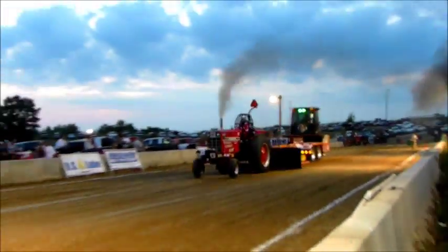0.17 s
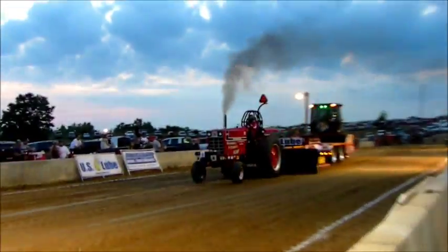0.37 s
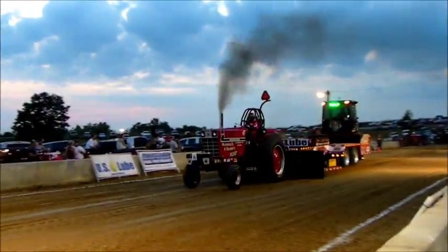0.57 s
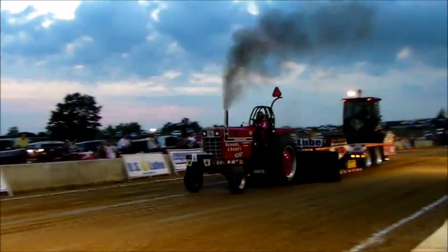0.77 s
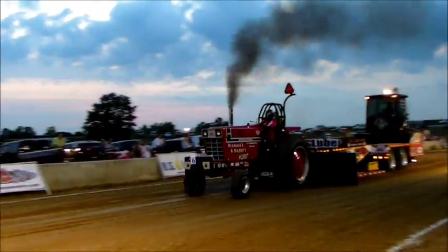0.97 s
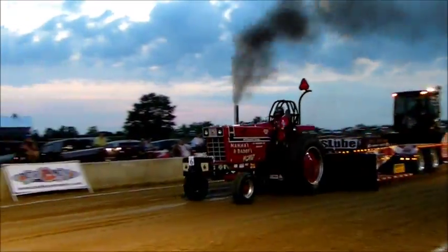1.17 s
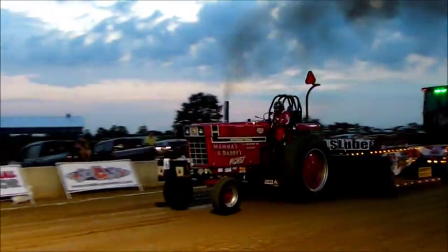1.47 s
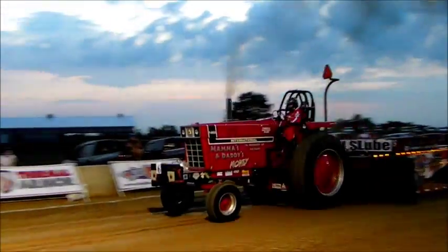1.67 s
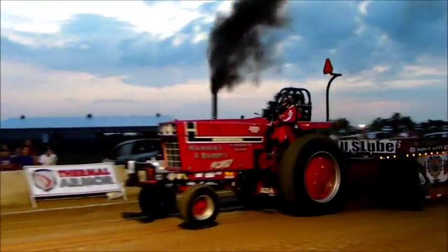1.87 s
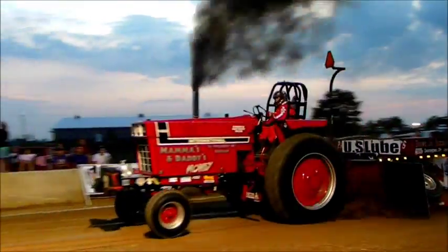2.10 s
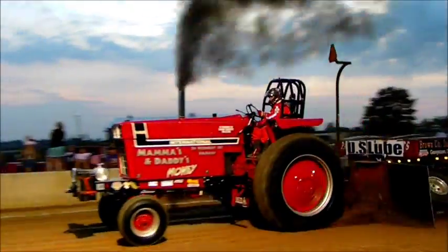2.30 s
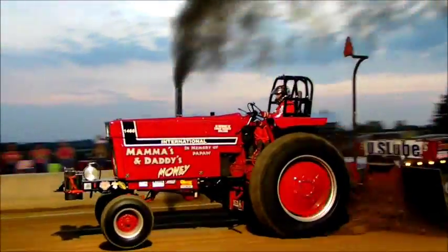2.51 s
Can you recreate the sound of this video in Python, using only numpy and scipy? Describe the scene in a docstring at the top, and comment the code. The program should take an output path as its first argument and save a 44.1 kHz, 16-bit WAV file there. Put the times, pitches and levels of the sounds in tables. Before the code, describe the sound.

A turbocharged diesel pulling tractor at full throttle outdoors, loud steady hissing exhaust with a buzzing mid roar and very high turbo whistle; late on it bogs, the whistle drops and the roar deepens. Mono, slightly overloaded microphone.

```python
"""Pulling tractor nearing the microphone

A turbocharged diesel drags a sled flat out along a dirt track towards the microphone.
Its exhaust stack hisses and roars in bursts, one per firing, made of coloured noise and wavering resonances.
A thin firing tone of a few harmonics lies under them, and the turbo whistles very high.
Near 1.75 s the engine bogs: the turbo drops, the roar sinks to its lower resonance, and boost slowly builds again."""
import sys
import numpy as np
from scipy.fft import rfft, irfft, next_fast_len
from scipy.io import wavfile
from scipy.ndimage import uniform_filter1d, map_coordinates

SR = 44100
rng = np.random.default_rng(int(sys.argv[2]) if len(sys.argv) > 2 else 0)


def transcribe(signal):
    """Save signal, clipped to [-1, 1], as a 16-bit WAV file at the path in sys.argv[1]."""
    frames = np.atleast_2d(signal).T
    limited = np.clip(frames, -1, 1)
    pcm = np.round(limited * 32767).astype(np.int16)
    wavfile.write(sys.argv[1], SR, pcm)


N = 116865

# Rumble of chassis, sled and track. Each row: time in seconds, level in dB before its wavering.
RUMBLE_LEVEL = [(.3, -47), (.7, -67), (1.6, -60), (2.05, -43.5)]
# Colour of the rumble. Each row: frequency in Hz, relative level in dB per Hz.
RUMBLE_COLOUR = [(20, -14), (60, 0.5), (120, 10), (190, -5), (270, -5), (380, 20), (600, -36)]

# Turbo blade tone. Each row: time in seconds, pitch in Hz before its wavering.
TURBO_PITCH = [(0, 14400), (.08, 14550), (.24, 14540), (.5, 15170), (.85, 15560), (1.08, 15660),
               (1.3, 15460), (1.47, 15430), (1.54, 15170), (1.72, 15150), (1.8, 13750), (1.875, 13080),
               (2.15, 13600), (2.32, 13640), (2.65, 14130)]
# Turbo whistle. Each row: time in seconds, level in dB before the core and skirt trims.
WHISTLE_LEVEL = [(0, -35), (.13, -26), (.4, -34), (1.05, -35), (1.38, -31), (1.7, -33), (1.78, -19.5),
                 (1.9, -30), (2.1, -24.5), (2.32, -25), (2.65, -26.5)]
CORE_HZ, SKIRT_HZ = 10, 190  # half widths of the noise around the blade tone
CORE_DB, SKIRT_DB, WHISTLE_FLUTTER_DB = -2, -2, 3  # trims, and rms flutter

# Engine speed. Each row: time in seconds, firings per second.
FIRING_RATE = [(0, 140.5), (.6, 137), (1.45, 133), (1.7, 128), (1.84, 117), (1.92, 118), (2.06, 125),
               (2.28, 116.5), (2.5, 119), (2.65, 117)]
# Firing tone. Each row: time in seconds, level in dB before the harmonic levels.
TONE_LEVEL = [(0.54, -41), (1.35, -44.5), (1.39, -60), (1.53, -44), (1.69, -49), (1.77, -55), (1.86, -39),
              (1.96, -53), (2.09, -38), (2.24, -47), (2.29, -40), (2.61, -47)]
# Harmonics of the firing tone. Each row: multiple of the firing rate, relative level in dB.
HARMONICS = [(1, -2.5), (2, -13.5), (3, -13.5)]

COUGH_S, COUGH_DB, COUGH_HALF_LENGTH_S = 1.898, -13, 0.0048
# Colour of the stack's one cough. Each row: frequency in Hz, relative level in dB per Hz.
COUGH_COLOUR = [(200, -43), (450, -6), (900, -13), (1600, 7), (2600, -8), (4500, 6), (15000, -23)]

BURST_DB, UNEVEN_DB = 1.85, 0.5  # swing of each firing, and of alternate cylinders, either side of the mean
BURST_SCATTER_DB, CRACKLE_DB = 0.6, 0.89  # random swell sizes and fast crackle
ROAR_SHARE = 0.62  # part of the burst swing, in dB, that the roar feels

# Exhaust jet. Each row: time in seconds, level in dB before bounce, valley and flutter.
JET_LEVEL = [(0, -17), (.55, -16), (1.66, -16), (1.74, -18.5), (1.8, -16.5), (2.6, -16)]
# Colour of the jet's hiss. Each row: frequency in Hz, relative level in dB per Hz.
HISS_COLOUR = [(900, -33), (2200, -16.5), (2700, -11), (3200, -9.5), (4000, -6), (4700, -3), (5500, -1.5),
               (6150, 0.5), (7100, -4.5), (8700, -6.5), (9400, -11), (9800, -18.5), (10500, -16.5),
               (11500, -25.5), (12600, -40), (14000, -25), (15700, -34)]
# Valley between roar and hiss. Each row: time in seconds, gain in dB at its centre (above 0 lifts).
VALLEY_GAIN = [(.86, 2), (1.02, -5.5), (1.13, 3.5), (1.22, -6), (1.35, -0.5), (2.1, 0.5)]
VALLEY_HZ, VALLEY_WIDTH_HZ = 2660, 310
# Extra fizz once the tractor is close. Each row: frequency in Hz, relative level in dB per Hz.
FIZZ_COLOUR = [(8000, -32), (10200, 7), (11200, 3), (12500, -11), (15700, -11)]
FIZZ_DB, FIZZ_FADE_S = -36, 0.24
SPLIT_HZ, HISS_FLUTTER_DB = 4500, 0.67  # the jet flutters separately below and above the split

# Exhaust roar. Each row: time in seconds, then levels in dB, before trims,
# of the low resonance, the upper resonance and the broad midrange.
ROAR_LEVELS = [(.04, -42, -23, -25), (.12, -38, -28.5, -25), (.55, -28, -26, -26), (.9, -32.5, -23.5, -26),
               (1.22, -29.5, -25.5, -26), (1.7, -30, -26.5, -27.5), (1.77, -38, -42, -29.5),
               (1.9, -26, -41, -27), (1.98, -30.5, -35, -27.5), (2.65, -31, -35, -28.5)]
# Centres of the two main resonances. Each row: time in seconds, low centre in Hz, upper centre in Hz.
ROAR_CENTRES = [(0, 520, 709), (.6, 496.5, 752), (1.1, 456.7, 745), (1.7, 446.5, 726.6), (2.65, 423.4, 660)]
# Third resonance, coming and going on full boost. Each row: time in seconds, centre in Hz, level in dB.
THIRD_RESONANCE = [(0, 859, -36), (.19, 900, -23), (.28, 960, -33), (.6, 970, -34), (.9, 950, -54),
                   (1.52, 1122, -50), (1.6, 1100, -24), (1.74, 1043, -52)]
LOW_WIDTH_HZ, UPPER_WIDTH_HZ = 25, 15.4  # half widths of the noise; the third resonance shares the low one
LOW_TRIM_DB, UPPER_TRIM_DB, MID_TRIM_DB = -3.5, -2.5, 1.74
# Surges of the low growl once the engine labours. Each entry: moment in seconds.
SURGE_TIMES = [1.901, 2.005, 2.09, 2.161, 2.259, 2.329, 2.45, 2.63]
SURGE_HALF_LENGTH_S, SURGE_DB = 0.018, -26
# Broad midrange on full boost. Each row: frequency in Hz, relative level in dB per Hz.
MID_BOOSTED = [(250, -38), (400, -6), (620, -2), (780, 1.5), (1000, -0.5), (1180, 1), (1330, -4.5),
               (1550, -3), (1800, -6), (2070, -5.5), (2300, -12), (3200, -24)]
# Broad midrange after the bog. Each row: frequency in Hz, relative level in dB per Hz.
MID_BOGGED = [(250, -41), (380, 3.5), (650, 4), (850, 1.5), (1050, 4.5), (1280, 2), (1600, 2), (1800, 0),
              (1930, 4.5), (2120, -3.5), (3200, -13)]
BOG_S, BOG_FADE_S = 1.664, 0.38  # middle and length of the midrange fade
FIRMNESS = 0.75  # hold of the upper resonance and whistle core: 0 = ringing noise, 1 = even tone

# Bounce off the track, later as the tractor nears. Each row: time in seconds, lag in seconds.
BOUNCE_LAG = [(0, .00105), (.7, 0.0012), (1.45, 0.001587), (2.65, .0024)]
ROAR_BOUNCE_GAIN, ROAR_BOUNCE_TOP_HZ = 0.37, 2500
HISS_BOUNCE_GAIN, HISS_BOUNCE_TOP_HZ = 0.22, 3300

NOTCH_HZ, NOTCH_HALF_WIDTH_HZ = 7870, 403  # microphone port
OVERLOAD_DB, TOP_HZ = -1.2, 15750  # ceiling of the rounded peaks, and band limit


def amp(db):
    """Decibels to gain."""
    return 10 ** (np.asarray(db) / 20)


def unit(x):
    """Scale to rms 1."""
    return x / np.sqrt(np.mean(x ** 2) + 1e-20)


def curves(rows):
    """One value per sample for each column after the time."""
    seconds, *columns = np.transpose(rows)
    return [np.interp(np.arange(N) / SR, seconds, column) for column in columns]


def ramp(middle_s, length_s):
    """Rise from 0 to 1 around a moment."""
    return np.clip((np.arange(N) / SR - middle_s) / length_s + 0.5, 0, 1)


def bump(middle_s, half_length_s):
    """A short bell-shaped swell of height 1."""
    return np.exp(-((np.arange(N) / SR - middle_s) / half_length_s) ** 2)


def wobble(rate):
    """A smooth random curve of rms 1, with rate knots a second."""
    knots = rng.standard_normal(N // 4)
    return unit(map_coordinates(knots, [np.arange(N) * rate / SR], mode="wrap"))


def filtered(x, response):
    """Apply a gain that is a function of frequency in Hz."""
    padded = next_fast_len(N + 8192)
    hz = np.fft.rfftfreq(padded, 1 / SR)
    return irfft(rfft(x, padded) * response(hz), padded)[:N]


def noise(colour):
    """Noise of rms 1, its colour drawn between points on a log frequency scale."""
    point_hz, point_db = np.transpose(colour)

    def response(hz):
        return amp(np.interp(np.log(hz + 1), np.log(point_hz), point_db))

    return unit(filtered(rng.standard_normal(N), response))


def slow_noise(width_hz):
    """Low-passed noise of rms 1 that sets how a resonance wavers."""
    return unit(filtered(rng.standard_normal(N), lambda hz: 1 / (1 + 0.5 * (hz / width_hz) ** 2)))


def resonance(centre_hz, width_hz, firm=0):
    """Turbulence ringing in a moving resonance; a firm one wavers more in pitch than in level."""
    a, b = slow_noise(width_hz), slow_noise(width_hz)
    phase = 2 * np.pi * np.cumsum(centre_hz) / SR
    ringing = a * np.cos(phase) + b * np.sin(phase)
    power = a * a + b * b + 1 / 20
    return unit(ringing / power ** (firm / 2))


def ground_bounce(x, gain, top_hz):
    """Add a duller copy from the track; its growing lag sweeps a comb down through the sound."""
    lag_s, = curves(BOUNCE_LAG)
    dull = filtered(x, lambda hz: 1 / (1 + (hz / top_hz) ** 4))
    return x + gain * map_coordinates(dull, [np.arange(N) - lag_s * SR], mode="wrap")


def rumble():
    """Chassis, sled and track rumble faintly under the exhaust as wavering low noise."""
    level_db, = curves(RUMBLE_LEVEL)
    return amp(level_db + 2.3 * wobble(24.0)) * noise(RUMBLE_COLOUR)


def turbo():
    """A fluttering blade tone inside a skirt of turbulence."""
    pitch_hz, = curves(TURBO_PITCH)
    level_db, = curves(WHISTLE_LEVEL)
    pitch_hz = pitch_hz + 18 * wobble(33)
    core = amp(CORE_DB) * resonance(pitch_hz, CORE_HZ, FIRMNESS)
    skirt = amp(SKIRT_DB) * resonance(pitch_hz, SKIRT_HZ)
    flutter = unit(amp(WHISTLE_FLUTTER_DB * wobble(35.5)))
    return amp(level_db) * (core + skirt) * flutter


def firing_tone(firings):
    """The clean low note of the cylinders firing: harmonics that waver in level one by one."""
    level_db, = curves(TONE_LEVEL)
    tone = 0
    for multiple, db in HARMONICS:
        tone = tone + amp(db + 0.92 * wobble(21.4)) * np.sin(2 * np.pi * multiple * firings)
    return amp(level_db) * np.sqrt(2) * tone


def cough():
    """One short puff of unburnt fuel from the stack as the engine bogs."""
    return amp(COUGH_DB) * bump(COUGH_S, COUGH_HALF_LENGTH_S) * noise(COUGH_COLOUR)


def bursts(firings):
    """Exhaust flow in dB: a swell for each firing, alternately strong and weak, with fast crackle on top."""
    swell = BURST_DB * np.cos(2 * np.pi * firings) + UNEVEN_DB * np.cos(np.pi * firings)
    # One random size per firing, joined by straight lines
    sizes = np.diff(rng.standard_normal(SR // 20))
    scatter = unit(map_coordinates(sizes, [firings], order=1))
    crackle = wobble(1300)
    crackle = crackle - uniform_filter1d(crackle, size=600)  # keep only its fast part
    return swell + BURST_SCATTER_DB * scatter + CRACKLE_DB * crackle


def exhaust_hiss(flow_db):
    """The jet from the stack hisses with every burst; more fizz arrives at close range."""
    level_db, = curves(JET_LEVEL)
    valley_db, = curves(VALLEY_GAIN)
    hiss = ground_bounce(noise(HISS_COLOUR), HISS_BOUNCE_GAIN, HISS_BOUNCE_TOP_HZ)
    valley = filtered(hiss, lambda hz: np.exp(-((hz - VALLEY_HZ) / VALLEY_WIDTH_HZ) ** 2))
    hiss = hiss + (amp(valley_db) - 1) * valley

    lower = filtered(hiss, lambda hz: 1 / (1 + (hz / SPLIT_HZ) ** 10))
    higher = hiss - lower
    jet = lower * amp(HISS_FLUTTER_DB * wobble(300)) + higher * amp(HISS_FLUTTER_DB * wobble(300))
    fizz = amp(FIZZ_DB) * ramp(BOG_S, FIZZ_FADE_S) * noise(FIZZ_COLOUR)
    return (amp(level_db) * jet + fizz) * unit(amp(flow_db))


def exhaust_roar(flow_db):
    """Three wavering resonances, the lowest swelling in surges, and a broad midrange that bounces off the track."""
    low_db, upper_db, mid_db = curves(ROAR_LEVELS)
    low_hz, upper_hz = curves(ROAR_CENTRES)
    third_hz, third_db = curves(THIRD_RESONANCE)

    surge = sum(amp(SURGE_DB) * bump(at_s, SURGE_HALF_LENGTH_S) for at_s in SURGE_TIMES)
    low_level = np.hypot(amp(low_db + LOW_TRIM_DB), surge)
    low = low_level * resonance(low_hz, LOW_WIDTH_HZ, FIRMNESS / 2)
    upper = amp(upper_db + UPPER_TRIM_DB) * resonance(upper_hz, UPPER_WIDTH_HZ, FIRMNESS)
    third = amp(third_db) * resonance(third_hz, LOW_WIDTH_HZ)

    bogged = ramp(BOG_S, BOG_FADE_S)
    mid = np.sqrt(1 - bogged) * noise(MID_BOOSTED) + np.sqrt(bogged) * noise(MID_BOGGED)
    mid = ground_bounce(mid, ROAR_BOUNCE_GAIN, ROAR_BOUNCE_TOP_HZ)
    mid = amp(mid_db + MID_TRIM_DB + 1.36 * wobble(60)) * mid
    return (low + upper + third + mid) * unit(amp(ROAR_SHARE * flow_db))


def scene():
    """The running count of firings times both the tone and the bursts of the exhaust."""
    firings = np.cumsum(curves(FIRING_RATE)[0]) / SR
    flow_db = bursts(firings)
    background = rumble() + turbo()
    exhaust = firing_tone(firings) + cough() + exhaust_hiss(flow_db) + exhaust_roar(flow_db)
    return (background + exhaust)[None]


def record(dry):
    """The microphone port cuts a narrow notch, the highest peaks round off, and the band limit cuts the top."""
    x = filtered(dry[0], lambda hz: 1 - 1 / (1 + 1j * (hz - NOTCH_HZ) / NOTCH_HALF_WIDTH_HZ))
    x = x / (1 + np.abs(x / amp(OVERLOAD_DB)) ** 10) ** (1 / 10)
    return filtered(x, lambda hz: hz < TOP_HZ)[None]


dry = scene()
out = record(dry)
transcribe(out)
```